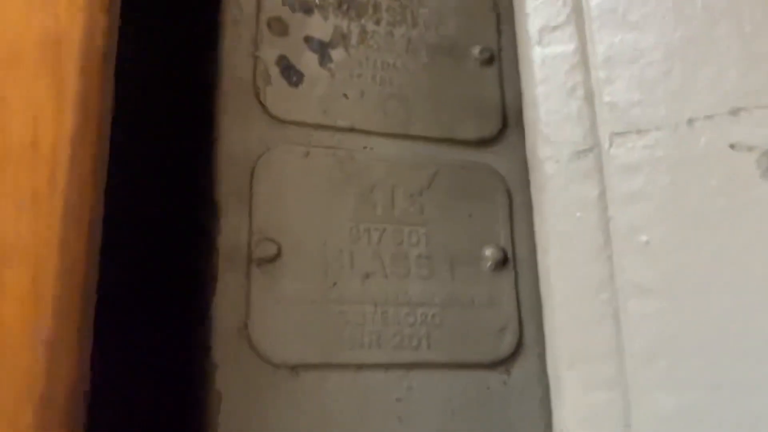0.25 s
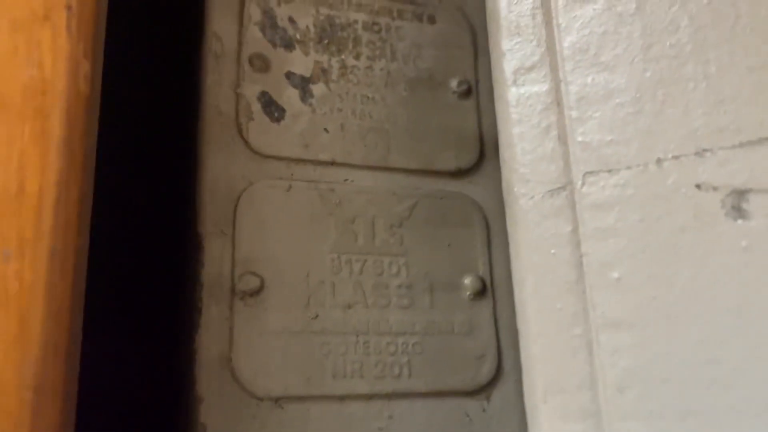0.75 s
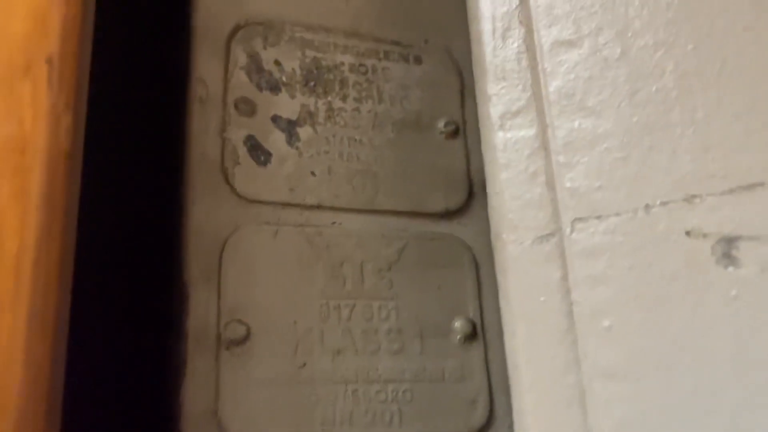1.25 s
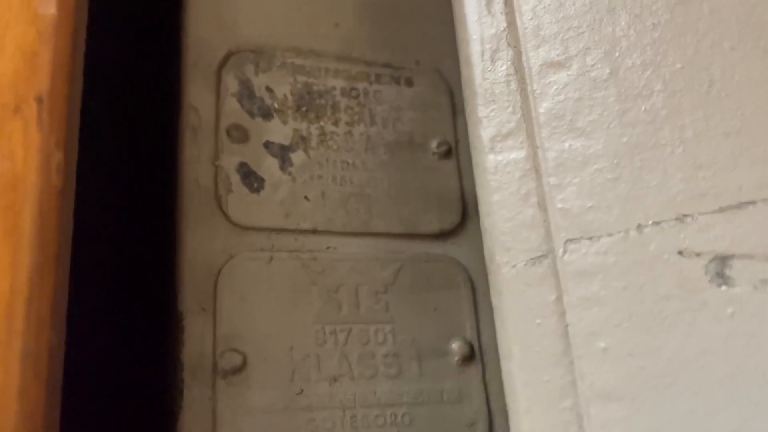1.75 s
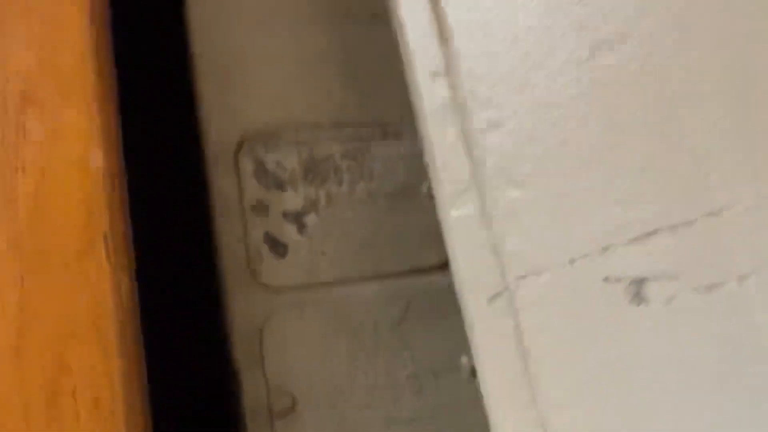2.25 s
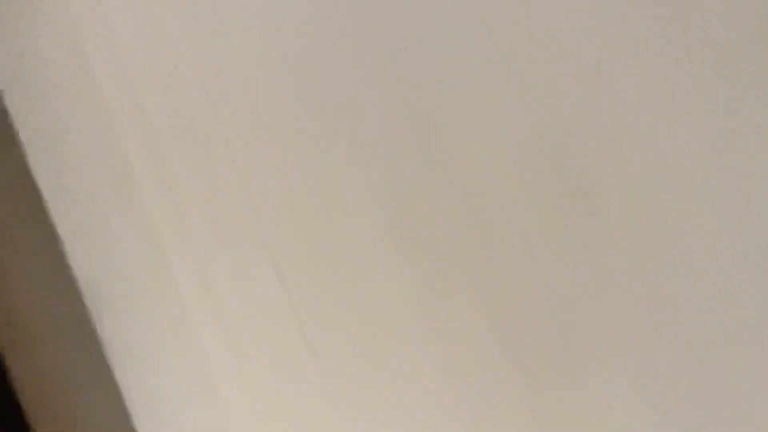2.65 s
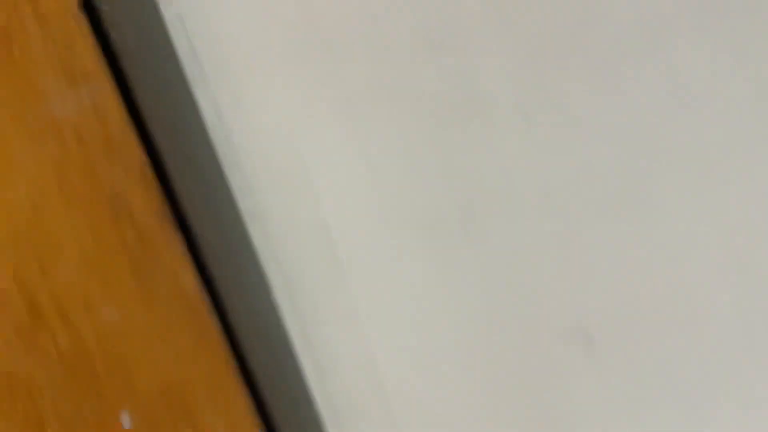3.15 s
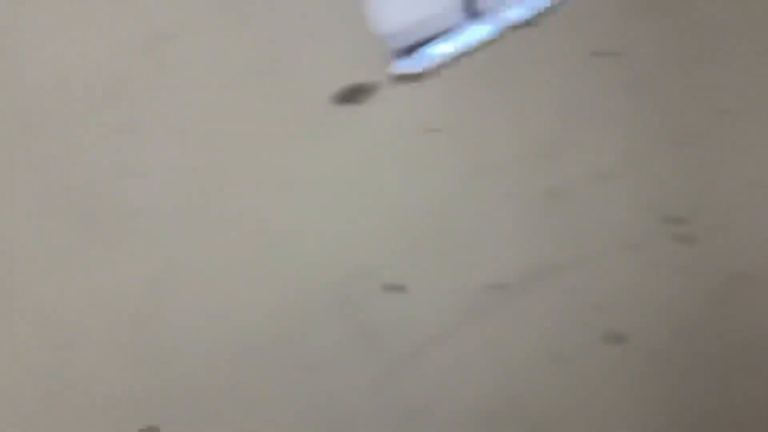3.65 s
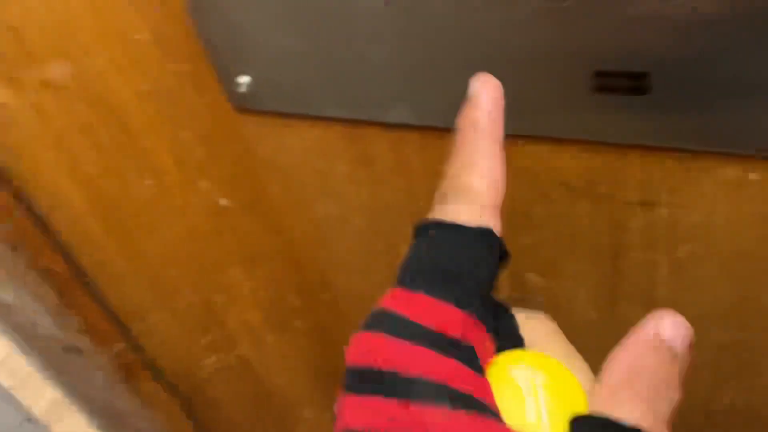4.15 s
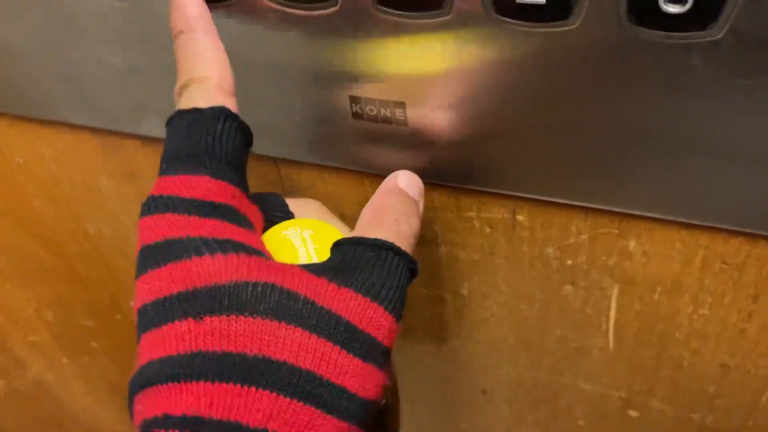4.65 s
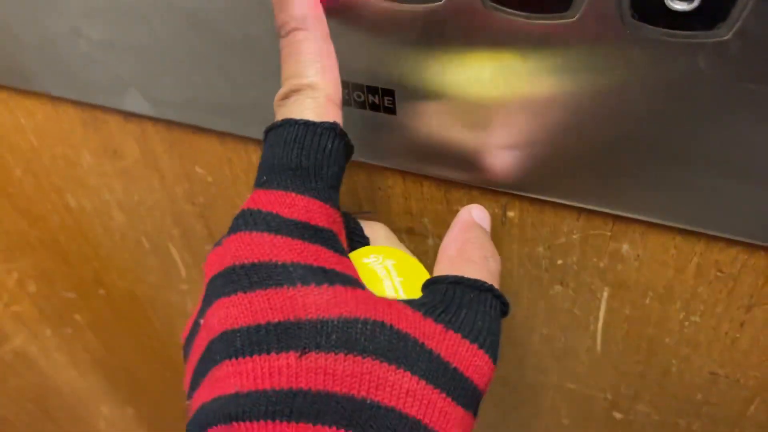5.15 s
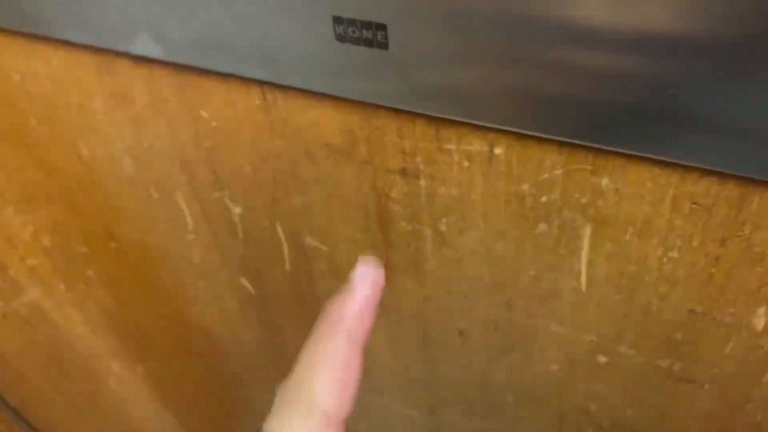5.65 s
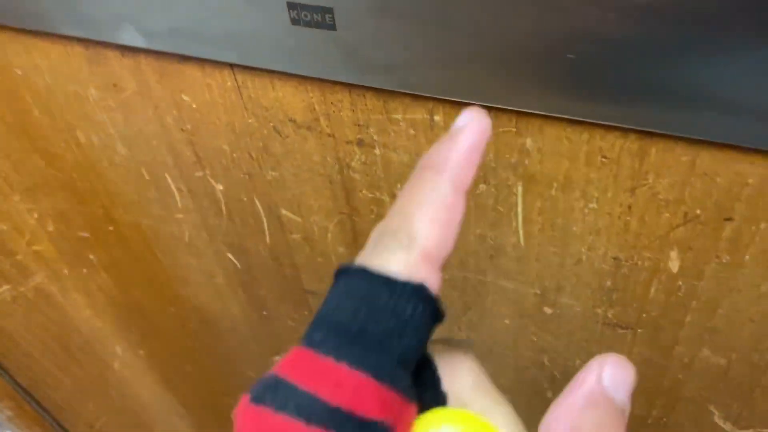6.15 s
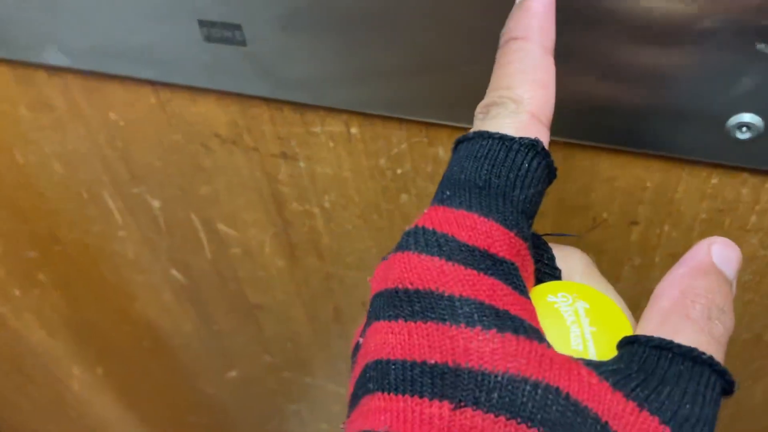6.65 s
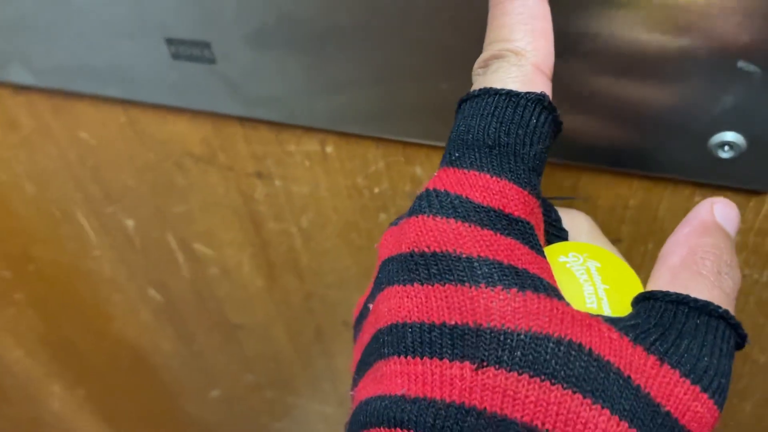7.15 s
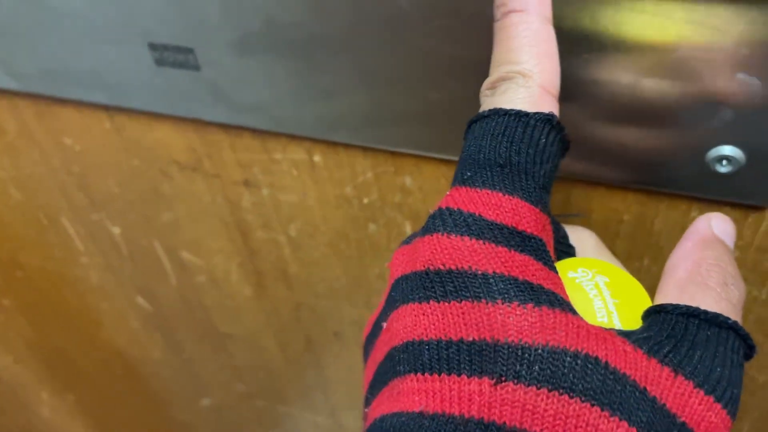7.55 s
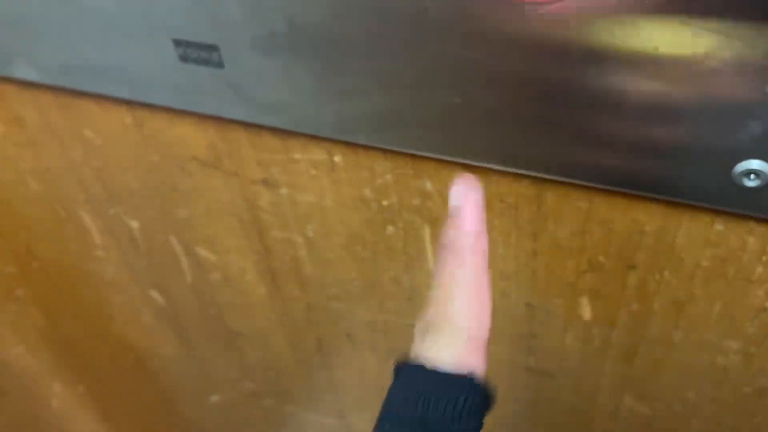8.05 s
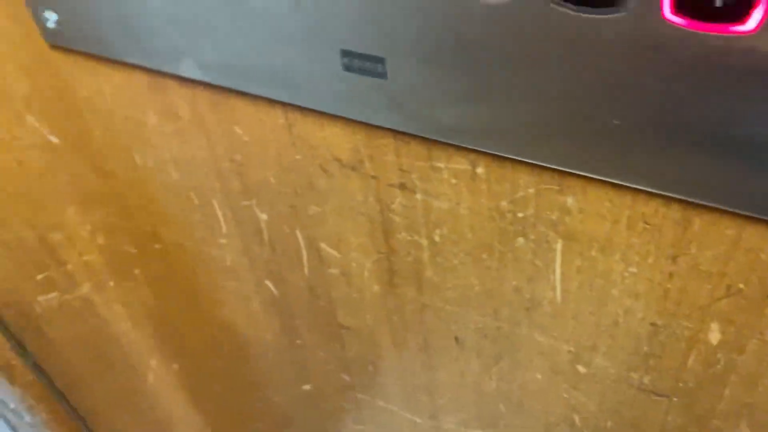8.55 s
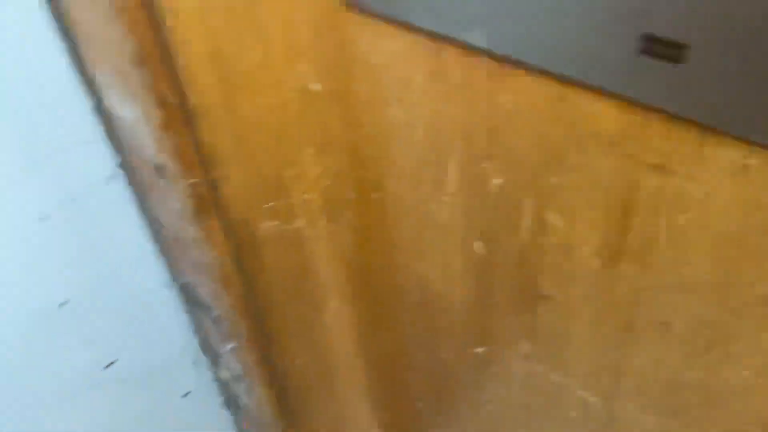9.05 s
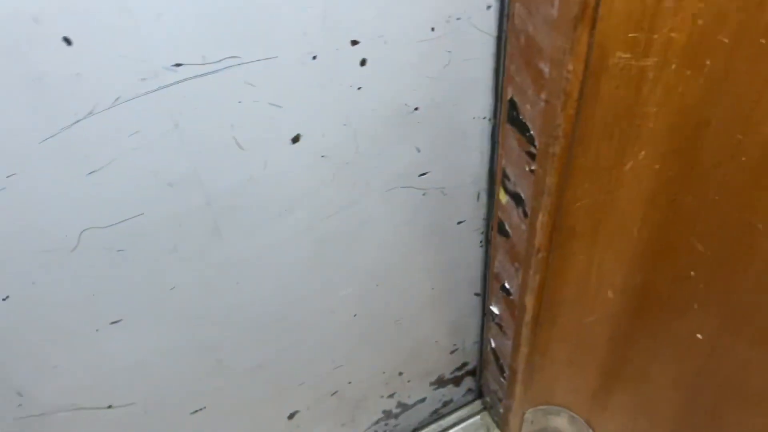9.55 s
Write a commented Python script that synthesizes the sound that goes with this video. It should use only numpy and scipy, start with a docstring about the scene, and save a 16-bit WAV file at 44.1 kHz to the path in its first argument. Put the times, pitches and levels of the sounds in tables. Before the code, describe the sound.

Someone shuffles into a rumbling lift, presses buttons, the door clacks and thuds with quick rebounds, the lock bangs and a low hum begins.

```python
"""A jacket rustles over low rumble and hum in an old wood-panelled lift cab; its wearer steps in.
A floor button is pressed, the swing door clacks on its closer, thuds shut and rebounds; a second press
follows, lock and brake let go with a bang, and the motor starts to hum.
Impacts are noise-excited panels, decaying sine modes and a cab tail; cloth, soles, shaft and air are
filtered noise; machine hums are wavering sines."""
import sys
import numpy as np
from scipy import signal
from scipy.fft import rfft, irfft
from scipy.io import wavfile

SR = 44100
rng = np.random.default_rng(int(sys.argv[2]) if len(sys.argv) > 2 else 0)


def unload_wav(signal):
    """Save mono or channel-first audio to the path in sys.argv[1] as 16-bit WAV at rate SR, clipped to [-1, 1]."""
    wavfile.write(
        sys.argv[1],
        SR,
        np.round(np.clip(np.atleast_2d(signal).T, -1, 1) * 32767).astype(np.int16),
    )


N = 432180
TIME_S = np.arange(N) / SR
AGE_S = np.arange(65536) / SR  # time since a blow
HZ = np.fft.rfftfreq(8192, 1 / SR)  # filter grid
EDGE_HZ = 16200  # upper band limit


def amp(db):
    """Decibels to gain."""
    return 10 ** (np.asarray(db) / 20)


def evened(x):
    """Scales to an rms of one."""
    return x / np.sqrt(np.mean(x ** 2) + 1e-20)


def read(points, hz):
    """Interpolates a spectrum on a log-frequency axis."""
    point_hz, value = np.transpose(points)
    return np.interp(np.log(hz + 1), np.log(point_hz + 1), value)


def follow(rows):
    """Interpolates (time, level) rows at every sample."""
    time_s, level_db = np.transpose(rows)
    return np.interp(TIME_S, time_s, level_db)


def add(mix, start_s, sound):
    """Mixes a sound in at its start time."""
    part = mix[round(start_s * SR):][:len(sound)]
    part += sound[:len(part)]


def colour(x, gain):
    """Causal minimum-phase filter with the given gain on the grid HZ."""
    log_gain = np.log(np.r_[gain, gain[-2:0:-1]] + 1e-6)
    response = np.exp(np.conj(signal.hilbert(log_gain)))
    taps = np.fft.ifft(response).real[:len(HZ)]
    return signal.oaconvolve(x, taps)[:len(x)]


def wander(per_s):
    """Random knots joined by straight lines, rms one."""
    knots = rng.standard_normal(2048)
    return evened(np.interp(TIME_S * per_s, np.arange(len(knots)), knots))


def hiss(spectrum):
    """Noise of rms one, shaped by a relative spectrum."""
    return evened(colour(rng.standard_normal(N), amp(read(spectrum, HZ))))


def swells(rows):
    """Summed power of bell-shaped swells, each rising and falling around its middle."""
    power = np.zeros(N)
    for middle_s, half_s, db in rows:
        offset = (TIME_S - middle_s) / half_s
        power += amp(db) ** 2 * np.exp(-2 * np.minimum(offset ** 2, 20))
    return power


# cab reverberation: (frequency [Hz], t60 [s], build-up [s])
CAB_REVERB = [(44.6, 0.74, 0.021), (142, 0.92, 0.0091), (330, 0.85, 0.016), (755, 0.38, 0.0034),
              (2190, 0.31, 0.00084), (4960, 0.3, 0.0012), (13800, 0.27, 0.0012)]


def blows(rows, body, modes, panel_t60_ratio, tail_db, modes_db, crack_db, snap_db, bass_hz):
    """Each blow: a direct crack, a dense ring of panels, a few clear modes and the cab's tail."""
    centre_hz, t60_s, build_s = np.transpose(CAB_REVERB)[:, :, None]
    bins_hz = np.fft.rfftfreq(len(AGE_S), 1 / SR)
    bands = np.array([read(np.c_[centre_hz, one], bins_hz) for one in np.eye(len(CAB_REVERB))])
    # the panels die in a fraction of the cab's t60
    panels = amp(-60 * AGE_S / (t60_s * panel_t60_ratio))
    tail = amp(tail_db) * amp(-60 * AGE_S / t60_s)
    decay = (panels + tail) * (1 - np.exp(-AGE_S / build_s))
    clear = sum(amp(db - 60 * AGE_S / life_s) * np.sin(2 * np.pi * hz * AGE_S)
                for hz, db, life_s in modes)
    bass = 1 / (1 + (HZ / bass_hz) ** 2)
    treble = 1 - 1 / (1 + (HZ / 2200) ** 2)
    # the crack has little bass; snap tilts its treble
    direct = amp(crack_db + snap_db * np.minimum(HZ / EDGE_HZ, 1)) * HZ / np.hypot(HZ, 600)
    body_gain = evened(amp(read(body, HZ)))
    out = np.zeros(N)
    for start_s, db, bass_db, treble_db, contact_s in rows:
        noise = irfft(bands * rfft(rng.choice([-1., 1.], len(AGE_S))))
        push = 1 - np.exp(-(AGE_S / max(contact_s, 1e-4)) ** 2)
        crack = colour(np.exp(-AGE_S / 0.001) * rng.choice([-1., 1.], len(AGE_S)), direct)
        dense = colour(push * ((noise * decay).sum(0) + crack), body_gain)
        tone = amp(db + bass_db * bass + treble_db * treble)
        add(out, start_s, colour(dense + amp(modes_db) * push * clear, tone))
    return out


# steady air spectrum: (frequency [Hz], relative level [dB])
AIR_SPECTRUM = [(100, -54.5), (500, -69), (1000, -69), (2400, -83), (3500, -80), (6000, -81), (16000, -77)]
AIR_DB_RMS = -59


def air():
    """Steady background air as filtered noise."""
    return amp(AIR_DB_RMS) * hiss(AIR_SPECTRUM)


# shaft spectrum: (frequency [Hz], relative level [dB])
SHAFT_SPECTRUM = [(18, -43), (32, -14.5), (50, 10), (72, -9.5), (86, 5), (110, -13), (165, 0.5), (220, -11),
                  (700, -19), (3000, -51.5)]
# rumble level: (time [s], level [dB])
RUMBLE_LEVEL = [(0.0, -44.5), (0.6, -46.5), (1.7, -44.5), (6.5, -53)]
# cab heaves as weight shifts and the door settles: (middle [s], half length [s], level [dB])
CAB_HEAVES = [(1.05, 0.15, -39), (3.22, 0.066, -53), (7.09, 0.039, -39)]


def shaft():
    """Low-frequency noise follows the rumble level and swells as the cab heaves."""
    power = amp(follow(RUMBLE_LEVEL)) ** 2 + swells(CAB_HEAVES)
    return hiss(SHAFT_SPECTRUM) * np.sqrt(power)


def hum(lines, waver_db, drift_hz):
    """Sines that waver in level and pitch."""
    out = np.zeros(N)
    for hz, db in lines:
        level = np.sqrt(2) * amp(db + waver_db * wander(4.9))
        drift_cycles = drift_hz * np.cumsum(wander(5.0)) / SR
        out += level * np.sin(2 * np.pi * (hz * TIME_S + drift_cycles))
    return out


# idle tones: (frequency [Hz], level before waver [dB rms])
IDLE_TONES = [(59.2, -49.5)]
# motor tones: (frequency [Hz], level before waver [dB rms])
MOTOR_TONES = [(57, -50), (96.9, -55), (161.5, -59), (246, -60), (492, -69.5)]
MOTOR_START_S, RUN_UP_S = 8.3, 0.17


def motor():
    """The idle hum crossfades into the motor's tones at the start."""
    running = np.clip((TIME_S - MOTOR_START_S) / RUN_UP_S, 0, 1)
    idle = hum(IDLE_TONES, waver_db=4.0, drift_hz=0.58)
    driven = hum(MOTOR_TONES, waver_db=3.5, drift_hz=2.14)
    return (1 - running) * idle + running * driven


def walls(x, count=10):
    """First echoes from the close walls comb the spectrum."""
    taps = np.zeros(round(.03 * SR))
    delays = rng.integers(len(taps) // 10, len(taps), count)
    taps[delays] = amp(-19) * rng.choice([-1., 1.], count)
    taps[0] = 1
    return signal.oaconvolve(x, taps / np.linalg.norm(taps))[:N]


# cloth rub, shell swish and top-treble fizz spectra: (frequency [Hz], relative level [dB])
RUB_SPECTRUM = [(150, -14), (800, -1.5), (1600, 2.5), (2400, 0.5), (3300, -9.5), (5000, -16.5),
                (9000, -16.5), (16000, -71)]
SWISH_SPECTRUM = [(1000, -32), (3000, -6), (4200, 1), (5400, -9.5), (7500, 3), (10000, -2), (13000, 1.5),
                  (16000, 0)]
FIZZ_SPECTRUM = [(6000, -25), (10000, -5), (13000, -3)]
# movement while stepping in, then with the door shut: (time [s], level [dB])
STEPPING_IN_MOVEMENT = [(0.0, -54.5), (0.88, -65.5), (1.37, -60.5), (1.89, -59), (2.06, -51.5), (2.55, -52),
                        (2.95, -48.5), (3.4, -50), (3.54, -46), (4.2, -48), (4.38, -59), (4.7, -62.5),
                        (4.87, -56), (5.1, -65.5), (5.45, -49.5), (5.6, -46.5), (5.75, -54), (6.21, -49),
                        (6.66, -58)]
SHUT_IN_MOVEMENT = [(6.95, -52), (7.2, -73.5), (7.61, -71), (7.84, -50.5), (8.18, -43), (8.6, -52),
                    (9.02, -59.5), (9.8, -64.5)]
# sleeve sweeps: (middle [s], half length [s], level [dB], fizz relative to sweep [dB])
SLEEVE_SWEEPS = [(0.17, 0.13, -48.5, -25), (2, 0.053, -42.5, -14), (2.435, 0.18, -37, -2.5),
                 (3.972, 0.26, -51.5, -24), (5.666, 0.073, -48, -15), (5.996, 0.092, -50, -16),
                 (7.937, 0.14, -50.5, -18)]
BRISK_DB = -47  # movement at which the shell reaches SHELL_DB
SHELL_DB, SHELL_DB_PER_DB = -52.5, 1.33
RUB_DB, SLEEVE_RUB_DB, SHELL_FIZZ_DB = 2, -9.5, -12  # relative to movement, sweep, shell
GRAIN_DB, CATCH_DB = 0.57, 1.78  # rms fluctuation


def jacket():
    """Cloth and shell noise follow movement and sleeve sweeps; cloth catches, threads slip in fine grain."""
    movement_db = follow(np.vstack([STEPPING_IN_MOVEMENT, SHUT_IN_MOVEMENT]))
    sweeps = swells([(s, half_s, db) for s, half_s, db, _ in SLEEVE_SWEEPS])
    sweep_fizz = swells([(s, half_s, db + fizz_db) for s, half_s, db, fizz_db in SLEEVE_SWEEPS])
    # powers
    shell = amp(SHELL_DB + SHELL_DB_PER_DB * (movement_db - BRISK_DB)) ** 2
    rub = amp(movement_db + RUB_DB) ** 2 + amp(SLEEVE_RUB_DB) ** 2 * sweeps
    fizz = amp(SHELL_FIZZ_DB) ** 2 * shell + sweep_fizz
    cloth = np.sqrt(rub) * hiss(RUB_SPECTRUM)
    swish = np.sqrt(shell + sweeps) * hiss(SWISH_SPECTRUM)
    top = np.sqrt(fizz) * hiss(FIZZ_SPECTRUM)
    grain = amp(GRAIN_DB * wander(120) + CATCH_DB * wander(18))
    return walls(grain * (cloth + swish + top))


# sole spectrum: (frequency [Hz], relative level [dB])
SOLE_SPECTRUM = [(100, 15.5), (400, -5), (1100, -1.5), (2300, -0.5), (3250, -4), (4600, -16), (7800, -18),
                 (10000, -27), (15000, -31)]
# sliding soles: (time [s], level [dB], rise [s], fade [dB/s], extra treble [dB])
SOLE_SCUFFS = [(0.868, -38.5, 0.055, 45, -1), (1.166, -42, .002, 54, -1), (3.156, -42, 0.021, 116, 19),
               (8.895, -42, 0.029, 130, 19), (8.953, -35.5, 0.0017, 270, 10)]


def scuffs(treble_hz=4500, grain_db=2, treble_fade_ratio=1.38):
    """A sole bites, then slides to a stop over the floor's grain; treble fades faster."""
    treble = 1 - 1 / (1 + (HZ / treble_hz) ** 4)
    low = colour(hiss(SOLE_SPECTRUM), 1 - treble)
    high = colour(hiss(SOLE_SPECTRUM), treble)
    out = np.zeros(N)
    for start_s, db, rise_s, fade_db_per_s, treble_db in SOLE_SCUFFS:
        age_s = np.maximum(TIME_S - start_s, 0)
        fade_db = fade_db_per_s * age_s
        slide = low * amp(db - fade_db) + high * amp(db + treble_db - treble_fade_ratio * fade_db)
        out += np.minimum(age_s / rise_s, 1) * slide
    return out * amp(grain_db * wander(200))


# footfalls: (time [s], level [dB], extra bass [dB], contact [s])
FOOTFALLS = [(1.95, -19, -44, 0.0031), (2.07, -26, -16, 0.006), (2.533, -20, -27.5, 0.0013),
             (3.158, -31.5, 6, 0.0015), (3.263, -52.5, 24.5, 0.013), (3.965, -36.5, 8, 0.0027),
             (5.752, -23.5, -11, 0.015), (8.827, -38, 4.5, 0.014), (8.901, -36, -1, 0.0051),
             (9.499, -41.5, 6.5, 0.0021)]
# floor panels: (frequency [Hz], relative level [dB])
FLOOR_PANELS = [(25, -16), (50, -2.5), (100, 4.5), (170, 7.5), (300, 2), (520, -2.5), (800, -15),
                (1800, -22.5), (16000, -81)]
# floor modes: (frequency [Hz], relative level [dB], t60 [s])
FLOOR_RING = [(50.25, -8, 1), (164.2, 3, 0.17), (234, -3, 0.22), (298.3, -0.5, 0.1), (351, -19, 0.61)]
# grit under a shoe: (time [s], level [dB], extra bass [dB], extra treble [dB], contact [s])
GRIT_TICKS = [(1.877, -24.5, -18, -27, 0.0016), (2.050, -39.5, 22.5, 5, 0.00017),
              (2.556, -30, 2, -34, 0.00025)]
# grit spectrum: (frequency [Hz], relative level [dB])
GRIT_SPECTRUM = [(100, -3.5), (1800, 7.5), (3200, -4.5), (8000, 1), (15000, -28)]


def shoes():
    """Shoes thump and scuff on the wooden floor; grit ticks under them."""
    footfalls = [(s, db, bass_db, 0, contact_s) for s, db, bass_db, contact_s in FOOTFALLS]
    steps = blows(footfalls, FLOOR_PANELS, FLOOR_RING, panel_t60_ratio=0.19, tail_db=-9.0,
                  modes_db=3, crack_db=-8, snap_db=0, bass_hz=224)
    ticks = blows(GRIT_TICKS, GRIT_SPECTRUM, [], panel_t60_ratio=0.091, tail_db=-4.0,
                  modes_db=0, crack_db=9, snap_db=31.5, bass_hz=860)
    return steps + scuffs() + ticks


# button touches and snaps: (time [s], level [dB], extra bass [dB], extra treble [dB], contact [s])
BUTTON_CLICKS = [(5.0773, -23, -4, -9.5, 0.00047), (5.246, -33, -24, -4, 0.00025),
                 (5.261, -23, -0.5, -3, 0.00014), (6.588, -42, -29, -1, 0.001),
                 (7.593, -36.5, -47, -3.5, 0.00094), (7.6415, -20.5, -4.5, -11.5, 0.00086),
                 (7.810, -23, 2, 0.5, 0.00047)]
# button panels: (frequency [Hz], relative level [dB])
BUTTON_PANELS = [(70, 1), (350, -7), (1100, -6.5), (1900, 0.5), (2700, -10.5), (4000, -18.5), (5200, -22.5),
                 (7600, -20.5), (10000, -27), (14500, -19.5)]
# button modes: (frequency [Hz], relative level [dB], t60 [s])
BUTTON_RING = [(188, -10.5, 0.93), (352.6, -11.5, 0.46), (1020, -2, 0.1), (1480, -13, 0.07),
               (2084, 2, 0.055), (2670, -4, 0.075), (3925, -7.5, 0.059), (6850, -20, 0.23)]


def buttons():
    """Buttons are touched and snap in and out as short, bright blows."""
    return blows(BUTTON_CLICKS, BUTTON_PANELS, BUTTON_RING, panel_t60_ratio=0.46, tail_db=-21.0,
                 modes_db=-3.5, crack_db=11.5, snap_db=9.0, bass_hz=452)


# closer clacks: (time [s], level [dB], extra bass [dB], extra treble [dB], contact [s])
CLOSER_CLACKS = [(6.246, -21, -33, 5.5, 0.011), (6.266, -25, -4.5, -4.5, 0.0054),
                 (6.459, -39.5, 15.5, -4, 0.0048)]
# closer panels: (frequency [Hz], relative level [dB])
CLOSER_PANELS = [(40, -28), (220, -5), (520, -8), (760, 0), (1100, -6), (2500, -6), (3500, -13),
                 (5000, -28.5), (7200, -23), (15000, -38)]
# closer modes: (frequency [Hz], relative level [dB], t60 [s])
CLOSER_RING = [(348, -11.5, 0.66), (639, -6.5, 0.32), (747, -1.5, 0.21), (947, -8, 0.3), (1306, 4, 0.15),
               (2036, -8, 0.14), (2340, 0.5, 0.079), (2550, -1, 0.094), (2670, -6, 0.09), (3150, -12, 0.13),
               (3413, -7, 0.09)]


def closer():
    """The door closer clacks as struck, ringing metal and panels."""
    return blows(CLOSER_CLACKS, CLOSER_PANELS, CLOSER_RING, panel_t60_ratio=0.51, tail_db=-16.0,
                 modes_db=0, crack_db=-7, snap_db=6, bass_hz=800)


# latch, frame, leaf at first landing: (delay [s], level [dB], extra bass [dB], extra treble [dB],
# contact [s], loss [dB per rebound])
LANDING_PARTS = [(0, -17.5, -9.5, -1.5, 0.00015, 4.5), (0.0156, -21, 10.5, 6, 0.0023, 5.5),
                 (0.027, -14.5, 2.5, -4, .004, 11)]
DOOR_SHUT_S, REBOUND_GAP_S, REBOUND_GAP_RATIO = 6.6815, .1035, .72
REBOUND_TREBLE_DB, REBOUND_BASS_DB = -2.5, 2  # added per rebound


def landings(count=6):
    """The door's blows: after the first gap, rebounds come ever sooner, weaker and duller."""
    rows, landing_s = [], DOOR_SHUT_S
    for k in range(count):
        for delay_s, db, bass_db, treble_db, contact_s, loss_db in LANDING_PARTS:
            rows.append((landing_s + delay_s, db - k * loss_db, bass_db + k * REBOUND_BASS_DB,
                         treble_db + k * REBOUND_TREBLE_DB, contact_s))
        landing_s += REBOUND_GAP_S * REBOUND_GAP_RATIO ** k
    return rows


# latch modes: (frequency [Hz], relative level [dB])
LATCH_RING = [(865, 2), (1717, -4), (1938, -3), (2260, 3), (2550, -9)]
LATCH_T60_S, CHATTER_PER_S = 0.045, 670
CHATTER_DB, CHATTER_RISE_S, CHATTER_FADE_DB_PER_S = -41.5, 0.027, 74


def chatter():
    """From the first rebound, random knocks ring the loose steel latch in its plate and die away."""
    age_s = TIME_S - DOOR_SHUT_S - REBOUND_GAP_S
    knocks = rng.choice([-1., 1.], N) * (rng.random(N) < CHATTER_PER_S / SR)
    fade_db = CHATTER_FADE_DB_PER_S * np.maximum(age_s - CHATTER_RISE_S, 0)
    level = np.clip(age_s / CHATTER_RISE_S, 0, 1) * amp(CHATTER_DB - fade_db)
    ring = sum(amp(db - 60 * AGE_S / LATCH_T60_S) * np.sin(2 * np.pi * (hz * AGE_S + rng.random()))
               for hz, db in LATCH_RING)
    return level * evened(signal.oaconvolve(knocks, ring)[:N])


# door panels: (frequency [Hz], relative level [dB])
DOOR_PANELS = [(24, -18), (45, 8), (110, -6), (330, -5.5), (550, -9), (1000, -18.5), (2300, -12),
               (3500, -25.5), (5500, -32), (15000, -33.5)]
# door modes: (frequency [Hz], relative level [dB], t60 [s])
DOOR_RING = [(40.73, -5, 1.55), (48.7, -8, 0.84), (76, -11.5, 1.2), (161.3, 1, 0.35), (199, 3.5, 0.16),
             (311, -9, 0.1), (309.6, 2, 0.35), (341, 0.5, 0.25), (503, -5, 0.35)]
# steel bolt against its plate: (time [s], level [dB])
BOLT_HITS = [(6.701, -29.5), (6.820, -39.5), (6.870, -44)]
# bolt spectrum: (frequency [Hz], relative level [dB])
BOLT_SPECTRUM = [(3000, -5), (5000, -10), (9000, -2.5), (13000, -3)]
# bolt modes: (frequency [Hz], relative level [dB], t60 [s])
BOLT_RING = [(493, -20, 2.3), (4650, -18, 0.16), (5930, -20, 0.13), (6800, -16, 0.1)]


def door():
    """The door lands, rebounds and comes to rest; its sprung bolt snaps home and the latch chatters."""
    leaf = blows(landings(), DOOR_PANELS, DOOR_RING, panel_t60_ratio=0.37, tail_db=-20.5,
                 modes_db=-6.5, crack_db=12, snap_db=-37, bass_hz=258)
    snaps = [(s, db, 0, 0, 0) for s, db in BOLT_HITS]
    bolt = blows(snaps, BOLT_SPECTRUM, BOLT_RING, panel_t60_ratio=0.63, tail_db=-26,
                 modes_db=6.5, crack_db=6, snap_db=7, bass_hz=260)
    return leaf + bolt + chatter()


# two pull-in thumps, two lock strikes, brake knock:
# (time [s], level [dB], extra bass [dB], extra treble [dB], contact [s])
LOCK_AND_BRAKE = [(8.056, -28.5, 8, 4, 0.019), (8.124, -17, 3.5, -4.5, 0.026),
                  (8.2112, -15, -14, 6.5, 0.0005), (8.2145, -8, 1.5, 1.5, 0.0025),
                  (8.527, -28, 2, -29, 0.0011)]
# cab jolts after the bang: (time [s], level [dB], extra bass [dB])
CAB_JOLTS = [(8.267, -29, 17), (8.407, -39.5, 26)]
JOLT_TREBLE_DB, JOLT_CONTACT_S = -31, 0.0034
# lock panels: (frequency [Hz], relative level [dB])
LOCK_PANELS = [(24, -18), (50, -3), (105, -7.5), (150, 0), (380, -10), (680, -10), (1100, -17), (2000, -12),
               (4400, -31), (5600, -39), (7200, -29.5), (12000, -51.5)]
# lock modes: (frequency [Hz], relative level [dB], t60 [s])
LOCK_RING = [(49.2, -5.5, 1.3), (83.2, -13.5, 2.4), (151, 3, 0.18), (214, -3.5, 0.3), (253, -7.5, 0.53),
             (299, -10.5, 0.57), (350, -13.5, 0.3), (537.6, -4.5, 0.29), (644, -11, 0.18),
             (715, -8.5, 0.22), (1358, -11, 0.34), (1580, -7, 0.14), (1780, -21, 0.15), (1956, -1.5, 0.18),
             (2312, -0.5, 0.14), (2540, 1, 0.068), (4570, -12.5, 0.072)]


def lock():
    """Lock and brake blows excite panels and modes; bass-heavy jolts shake the cab."""
    jolts = [(s, db, bass_db, JOLT_TREBLE_DB, JOLT_CONTACT_S) for s, db, bass_db in CAB_JOLTS]
    return blows(LOCK_AND_BRAKE + jolts, LOCK_PANELS, LOCK_RING, panel_t60_ratio=0.37, tail_db=-11.0,
                 modes_db=-4.5, crack_db=17.0, snap_db=0.5, bass_hz=217)


def scene():
    """Everything heard in the cab, in mono."""
    background = air() + shaft() + motor()
    person = jacket() + shoes() + buttons()
    return (background + person + closer() + door() + lock())[None]


def record(dry):
    """Rounds off the loudest peaks, then limits the band."""
    rounded = dry / (1 + (dry / .92) ** 6) ** (1 / 6)
    lowpass = signal.firwin(511, EDGE_HZ, window=("kaiser", 9), fs=SR)
    return signal.oaconvolve(rounded, lowpass[None], "same")


dry = scene()
out = record(dry)
unload_wav(out)
```